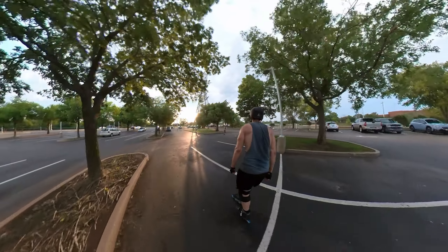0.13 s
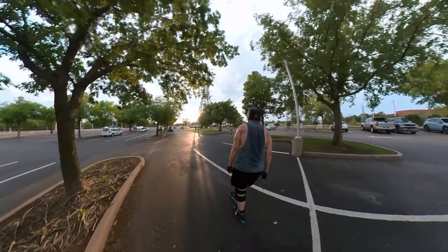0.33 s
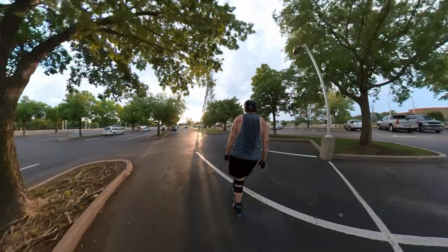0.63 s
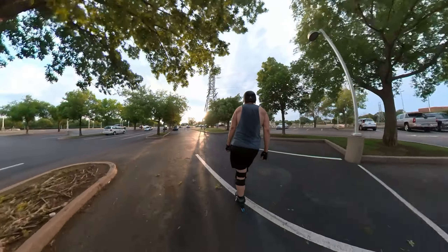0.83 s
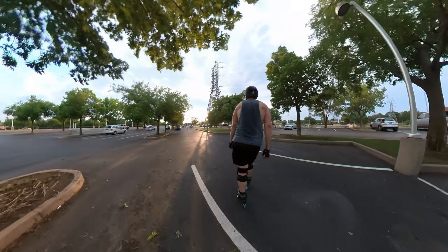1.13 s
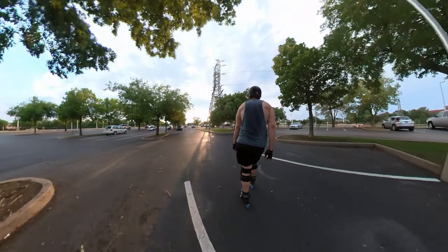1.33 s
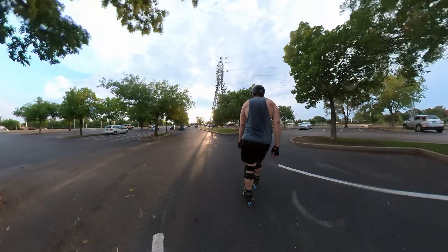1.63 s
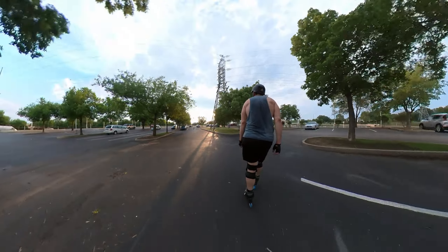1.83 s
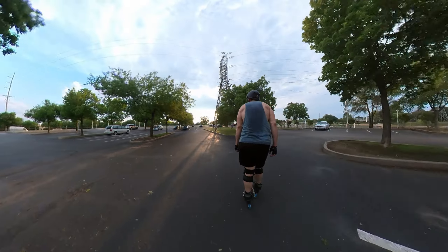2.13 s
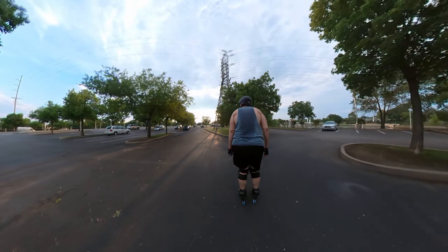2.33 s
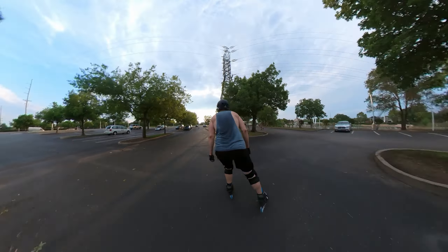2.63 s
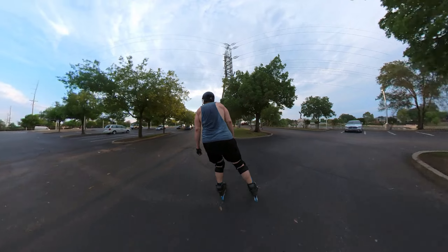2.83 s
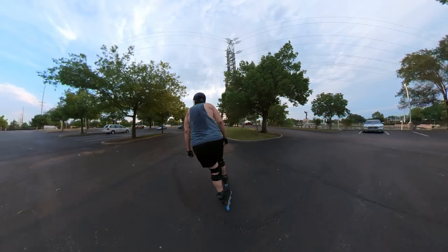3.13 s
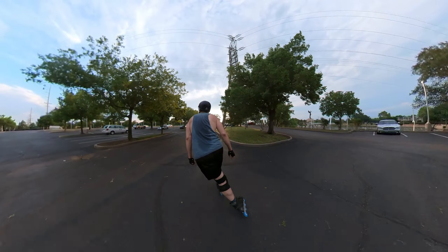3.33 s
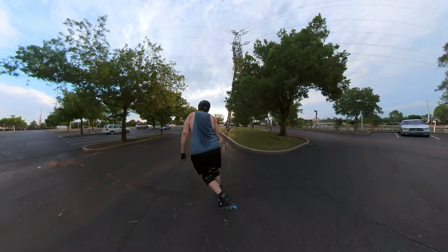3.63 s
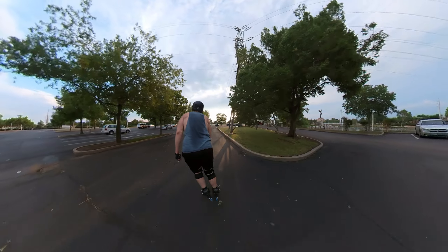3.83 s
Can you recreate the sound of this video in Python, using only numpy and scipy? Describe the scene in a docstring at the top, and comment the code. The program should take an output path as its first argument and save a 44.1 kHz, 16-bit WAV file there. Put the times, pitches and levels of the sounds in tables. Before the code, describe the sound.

Low fluttering wind with irregular soft thumps dominates throughout; beneath it skate wheels roll with gritty ticks, brighter at the start, then fainter and hollow in stride-like surges, outdoors, followed by a moving microphone.

```python
"""Wind rumbles on a moving microphone that closely follows an inline skater across an asphalt car park.
The rumble is flickering shaped noise; one gust swells into a brighter rush, and short eddies knock throughout.
The wheels roar and grind stride by stride: noise and dense random impacts follow the load on them.
Ticks of grit, a few bright hisses and a faint treble sizzle lie on top."""
import sys
import numpy as np
from scipy import signal
from scipy.fft import rfft, irfft, next_fast_len
from scipy.io import wavfile

SR = 44100
rng = np.random.default_rng(int(sys.argv[2]) if len(sys.argv) > 2 else 0)


def wav_out(sig):
    """Save sig, one row per channel (or a flat mono array), as 16-bit PCM at SR to the path in sys.argv[1]."""
    wavfile.write(sys.argv[1], SR, np.round(np.clip(np.atleast_2d(sig).T, -1, 1) * 32767).astype(np.int16))


N = 175518
T = np.arange(N) / SR
FREQS = np.maximum(np.fft.rfftfreq(N, 1 / SR), 1)


def undb(db):
    """Level law: decibels to amplitude gain."""
    return 10 ** (np.asarray(db) / 20)


def unit(x):
    """Normalisation: scale to a standard deviation of 1."""
    return x / np.std(x)


def curve(rows, axis=1):
    """Linear interpolation: one column of a table joined by straight lines in time."""
    rows = np.array(rows)
    return np.interp(T, rows[:, 0], rows[:, axis])


def colour(x, points):
    """Spectral shaping: a zero-phase filter through (Hz, dB) points on a logarithmic frequency axis."""
    hz, db = np.array(points).T
    size = next_fast_len(N + SR // 10)
    bins = np.maximum(np.fft.rfftfreq(size, 1 / SR), 1)
    gain = undb(np.interp(np.log(bins), np.log(hz), db))
    return irfft(rfft(x, size) * gain, size)[:N]


def band(x, low_hz, high_hz, slope):
    """Zero-phase band-pass: falls 12 dB an octave below, and 6 dB times slope an octave above."""
    size = next_fast_len(N)
    hz = np.maximum(np.fft.rfftfreq(size, 1 / SR), 1)
    low_loss = 1 + (low_hz / hz) ** 4
    high_loss = 1 + (hz / high_hz) ** (2 * slope)
    return irfft(rfft(x, size) / np.sqrt(low_loss * high_loss), size)[:N]


def noise():
    """White noise: equal mean power at every frequency."""
    return rng.standard_normal(N)


def walk(hz):
    """Random modulation: noise under a Gaussian low-pass of the given width, with a spread of 1."""
    return unit(irfft(rfft(noise()) * np.exp(-(FREQS / hz) ** 2), N))


# Wind pressure on the microphone. Each row: time in seconds, relative level in dB.
WIND_LEVEL = [(0, -27), (.18, -24.5), (.45, -27.5), (.65, -25.5), (.83, -25.5), (.92, -32), (1.0, -23.5),
              (1.12, -27), (1.25, -27), (1.4, -24), (1.48, -22.5), (1.56, -35), (1.62, -25), (1.7, -30.5),
              (1.8, -25.5), (1.97, -26.5), (2.12, -24), (2.3, -27.5), (2.41, -31), (2.44, -34), (2.58, -32),
              (2.8, -23.5), (2.95, -27), (3.1, -22), (3.22, -24.5), (3.38, -22), (3.45, -22), (3.6, -32.5),
              (3.7, -24.5), (3.78, -33.5), (3.97, -24)]
# Spectrum of the wind rumble. Each row: frequency in Hz, relative density in dB per Hz.
RUMBLE_SPECTRUM = [(15, 0.5), (28, -8), (60, -1), (120, -0.5), (190, -4), (300, -13), (500, -24.5),
                   (900, -38), (2000, -72), (5000, -93.5)]
RUMBLE_DB, SURGE_DB = 1.5, 0.7  # added level, spread of the surges
FLUTTER_DB, FLUTTER_HZ = 3, 23.1  # spread of the flutter, width of the modulation


def rumble():
    """Turbulent pressure: the rumble surges as a whole, its upper part flutters with passing eddies."""
    air = unit(colour(noise(), RUMBLE_SPECTRUM))
    low = band(air, 1, 130, slope=2)
    upper = (air - low) * undb(FLUTTER_DB * walk(FLUTTER_HZ))
    level_db = curve(WIND_LEVEL) + RUMBLE_DB + SURGE_DB * walk(FLUTTER_HZ)
    return unit(low + upper) * undb(level_db)


# A gust that swells into a rush. Each row: time in seconds, level in dB, upper band edge in Hz.
GUST_COURSE = [(0, -42, 467), (.3, -36, 468), (.5, -31.5, 473), (.6, -29, 560), (.68, -27.5, 657),
               (.8, -28.5, 840), (.84, -29.5, 767), (.875, -24.5, 850), (.91, -44, 590), (.95, -27.5, 700),
               (1.0, -73, 494)]
GUST_LOW_HZ, GUST_KNEE_HZ = 225, 250


def gust():
    """Eddy scaling: faster air makes smaller eddies, so the rush brightens as it grows, then breaks off."""
    edge_hz = curve(GUST_COURSE, axis=2)
    air = band(noise(), 0.92, GUST_KNEE_HZ, 1)
    # Crossfade between fixed filters to move the upper edge.
    steps_hz = np.geomspace(300, 1500, 7)
    rush = 0
    for hz, pick in zip(steps_hz, np.eye(len(steps_hz))):
        share = np.interp(edge_hz, steps_hz, pick)
        rush = rush + share * unit(band(air, GUST_LOW_HZ, hz, slope=2.58))
    return rush * undb(curve(GUST_COURSE) + 0.31 * walk(84))


# Eddies that knock on the microphone. Each row: centre in seconds, level of the swell in dB,
# Gaussian length (standard deviation) in seconds, upper band edge in Hz, peak of the thump in dB.
EDDIES = [(0.042, -27.5, 0.016, 121, -11), (.275, -29.5, 0.019, 120, -17.5), (0.437, -25, 0.0057, 140, -11),
          (1.047, -24, 0.0038, 520, -14.5), (1.061, -24.5, 0.0045, 122.5, -12),
          (1.307, -25, 0.01, 296, -14), (1.452, -24, .009, 120, -14), (1.494, -23, 0.0051, 250, -6.5),
          (1.514, -21.5, 0.0075, 450, -10), (1.525, -24.5, 0.0097, 757, -11.5),
          (1.546, -26.5, .007, 523, -16.5), (1.63, -27.5, 0.0087, 770, -14.5),
          (2.229, -24.5, .0064, 152, -9), (2.363, -23, 0.0063, 275, -15.5), (2.38, -28, 0.0034, 170, -12.5),
          (2.390, -19.5, .0045, 680, -15), (2.396, -22, 0.0033, 400, -16), (2.411, -23, 0.0069, 100, -15),
          (2.621, -25, .006, 171, -11), (2.835, -24, 0.016, 450, -15.5), (2.856, -25.5, .007, 130, -11.5),
          (2.859, -32.5, .005, 480, -12.5), (3.114, -23.5, 0.015, 440, -16.5), (3.156, -25, .007, 500, -19),
          (3.382, -25.5, 0.014, 284, -14.5), (3.467, -23, 0.0042, 212, -12),
          (3.486, -25.5, 0.0025, 500, -10.5), (3.57, -24, .0051, 131, -12.5), (3.69, -29, .01, 99, -19.5),
          (3.735, -27, 0.011, 480, -15.5), (3.903, -23.5, 0.011, 119.3, -9.5),
          (3.942, -26.5, 0.006, 490, -23.5)]
BUFFET_LOW_HZ, BUFFET_SLOPE, BUFFET_KNEE_HZ = 44.3, 4.9, 182
THUMP_LOW_HZ, THUMP_SLOPE, THUMP_KNEE_HZ = 35, 4, 230
THUMP_LOW_SHARE = 0.2  # lower edge of the thump as a share of its upper edge


def buffets():
    """Pressure pulses: eddies thump in a swell of noise; a higher upper edge knocks higher, less bassy."""
    out = 0
    for at, swell_db, length, hz, thump_db in EDDIES:
        swell = np.exp(-.5 * ((T - at) / length) ** 2)
        eddy = band(noise() * swell, 0.73, BUFFET_KNEE_HZ, 1)
        eddy = band(eddy, BUFFET_LOW_HZ, hz, BUFFET_SLOPE)
        impulse = 1. * (np.arange(N) == int(at * SR))
        thump = band(impulse, THUMP_LOW_HZ, THUMP_KNEE_HZ, 1)
        thump = band(thump, THUMP_LOW_SHARE * hz, hz, THUMP_SLOPE)
        out = out + undb(swell_db) * unit(eddy) * np.std(swell)
        out = out - undb(thump_db) * thump / thump.max()  # main peak points downwards
    return out


# Low roar as the skates push. Each row: time in seconds, relative level in dB.
ROAR_LEVEL = [(0, -48), (.9, -56.5), (1.25, -46.5), (1.48, -51), (1.56, -59), (1.93, -42.5), (2.2, -52),
              (2.43, -49.5), (2.56, -44.5), (2.77, -42), (2.88, -61), (3.05, -49.5), (3.2, -54.5),
              (3.36, -43.5), (3.5, -50.5), (3.62, -55.5), (3.76, -53.5), (3.85, -41), (3.97, -47.5)]
# Spectrum of the roar. Each row: frequency in Hz, relative density in dB per Hz.
ROAR_COLOUR = [(70, -0.5), (120, 28.5), (170, 24), (260, 20.5), (400, 7.5), (700, 5), (1000, 1),
               (1450, -5.5), (2000, -14.5), (3500, -57.5)]
ROAR_DB = 12  # added level


def roar():
    """Forced vibration: rough asphalt shakes wheels and boots, heard as low shaped noise."""
    level_db = curve(ROAR_LEVEL) + ROAR_DB + 1.7 * walk(21)
    return unit(colour(noise(), ROAR_COLOUR)) * undb(level_db)


# Load on the wheels through the strides. Each row: time in seconds, relative level in dB.
WHEEL_LOAD = [(.03, -49), (.55, -55.5), (.75, -55), (1.1, -51.5), (1.3, -52.5), (1.485, -54),
              (1.495, -66.5), (1.56, -66.5), (1.68, -63), (1.9, -55.5), (2.21, -51), (2.26, -59.5),
              (2.34, -52), (2.42, -62), (2.56, -47.5), (2.61, -55), (2.75, -53.5), (2.86, -64), (3.06, -57),
              (3.13, -65.5), (3.34, -55), (3.5, -72.5), (3.62, -67), (3.75, -64.5), (3.84, -63.5),
              (3.96, -61.5)]
# Rolling spectrum at first. Each row: frequency in Hz, relative density in dB per Hz.
OPEN_SPECTRUM = [(150, 15), (500, -2.5), (1000, 2), (1800, -2), (3000, -2.5), (5000, -8.5), (6500, -14),
                 (8500, -30), (15000, -46)]
# Later rolling spectrum, hollow in the treble. Each row: frequency in Hz, relative density in dB per Hz.
HOLLOW_SPECTRUM = [(150, 6), (500, 15.5), (900, 10), (1500, 6.5), (2000, -1), (3200, -5.5), (3750, -21),
                   (4200, -25.5), (5200, -31.5), (7000, -16), (8300, -26), (9200, -51.5), (15000, -58)]
# Grit under the wheels and clicks of the skates. Each row: start in seconds, relative level in dB.
TICK_TIMES = [(.114, -48.5), (0.298, -36), (.575, -41.5), (.748, -41.5), (1.043, -35.5), (1.091, -42),
              (1.244, -43), (1.455, -40), (1.482, -37.5), (1.894, -41.5), (2.003, -39.5), (2.272, -44),
              (2.55, -40), (2.925, -48), (3.164, -44.5), (3.777, -53.5)]
TICK_S = .002  # decay time
HOLLOW_FROM_S, HOLLOW_BY_S = 0.94, 1.314
OPEN_DB, HOLLOW_DB = -4, -1  # added levels
CHATTER_DB, CHATTER_HZ = 1.85, 65.4  # spread and width of the modulation
GRAINS_PER_S, GRAIN_SPREAD_DB, SMOOTH_SHARE = 1900, 2.5, 0.8


def wheels():
    """Random impact excitation: dense tiny blows of the asphalt, scaled by the load, with ticks and grit."""
    struck = rng.random(N) < GRAINS_PER_S / SR
    grain_db = GRAIN_SPREAD_DB * np.minimum(rng.exponential(size=N), 6)
    grains = struck * np.sign(noise()) * undb(grain_db)
    surface = unit(unit(grains) + SMOOTH_SHARE * noise())
    load_db = curve(WHEEL_LOAD) + CHATTER_DB * walk(CHATTER_HZ)
    contact = unit(surface + grit()) * undb(load_db)
    ticks = sum(undb(db) * (T >= at) * np.exp(-np.abs(T - at) / TICK_S) for at, db in TICK_TIMES)
    contact = contact + noise() * ticks
    contact = contact * np.sqrt(SR / 2 / 1800)  # white noise of level 1 gets unit power per 1800 Hz
    hollow = np.interp(T, [HOLLOW_FROM_S, HOLLOW_BY_S], [0, 1])
    open_roll = undb(OPEN_DB) * colour(contact, OPEN_SPECTRUM)
    hollow_roll = undb(HOLLOW_DB) * colour(contact, HOLLOW_SPECTRUM)
    return (1 - hollow) * open_roll + hollow * hollow_roll


GRIT_PER_S, GRIT_SPREAD_DB, GRIT_S = 28, 3, .0012  # rate, spread, decay time in seconds
GRIT_LOW_HZ, GRIT_HIGH_HZ = 1800, 5400


def grit():
    """Damped resonance: stray sand cracks under the wheels at random, each grain with a very short ring."""
    out, age = np.zeros(N), np.arange(SR // 100) / SR
    for place, pitch, size in rng.random((int(GRIT_PER_S * N / SR), 3)):
        start = int(place * (N - len(age)))
        hz = GRIT_LOW_HZ * (GRIT_HIGH_HZ / GRIT_LOW_HZ) ** pitch
        db = GRIT_SPREAD_DB * min(-np.log(size), 2)
        ring = np.sin(2 * np.pi * hz * age) * np.exp(-age / GRIT_S)
        out[start:start + len(age)] += undb(db) * ring
    return out


# Short bright scrapes. Each row: start in seconds, level in dB, decay time in seconds.
SCRAPES = [(.134, -64, 0.038), (0.297, -48.5, 0.0083), (0.314, -56.5, 0.1), (.38, -63.5, 0.04),
           (.63, -74, 0.043)]
# Spectrum of the scrapes. Each row: frequency in Hz, relative density in dB per Hz.
SCRAPE_SPECTRUM = [(3000, -23), (6000, 5.5), (9000, 3), (14000, 2.5), (16000, -2.5)]
HISS_ATTACK_S = 0.00063
HISS_CRACKLE_DB, HISS_CRACKLE_HZ = 1, 140  # spread and width of the modulation


def hisses():
    """Friction noise: thin bright scrapes start quickly and crackle as they die away exponentially."""
    level = 0
    for at, db, decay in SCRAPES:
        attack = np.clip((T - at) / HISS_ATTACK_S, 0, 1)
        level = level + undb(db) * attack * np.exp(-np.abs(T - at) / decay)
    crackle = noise() * undb(HISS_CRACKLE_DB * walk(HISS_CRACKLE_HZ))
    return unit(colour(crackle, SCRAPE_SPECTRUM)) * level


# Thin treble of the wheels. Each row: time in seconds, relative level in dB.
SIZZLE_LEVEL = [(.9, -88), (1.1, -79), (1.3, -70), (1.47, -69.5), (1.53, -81.5), (1.7, -79.5),
                (1.93, -66.5), (2.15, -71), (2.43, -80), (2.56, -76.5), (2.74, -72), (2.86, -80),
                (3.07, -71), (3.2, -79), (3.34, -83.5), (3.52, -93), (3.69, -75), (3.82, -87.5),
                (3.9, -106)]
# Spectrum of the sizzle. Each row: frequency in Hz, relative density in dB per Hz.
SIZZLE_COLOUR = [(4500, -38.5), (5600, -13.5), (6400, -3.5), (7200, 0.5), (8100, -2), (9000, -22),
                 (10000, -43)]
SIZZLE_DB, SIZZLE_CHATTER_DB = -1, 4  # added level, spread of the flicker


def sizzle():
    """Fine-scale roughness: the finest grain of the asphalt flickers high above the roll."""
    level_db = curve(SIZZLE_LEVEL) + SIZZLE_DB + SIZZLE_CHATTER_DB * walk(CHATTER_HZ)
    return unit(colour(noise(), SIZZLE_COLOUR)) * undb(level_db)


def scene():
    """Superposition: the pressures of wind and skates add in one channel."""
    wind = rumble() + gust() + buffets()
    skates = roar() + wheels() + hisses() + sizzle()
    return (wind + skates)[None]


TOP_HZ = 15700


def record(dry):
    """Band limiting: a steep elliptic low-pass cuts the top."""
    low_pass = signal.ellip(8, .2, 70, TOP_HZ, fs=SR, output="sos")  # ripple and rejection in dB
    return signal.sosfilt(low_pass, dry)


dry = scene()
out = record(dry)
wav_out(out)
```